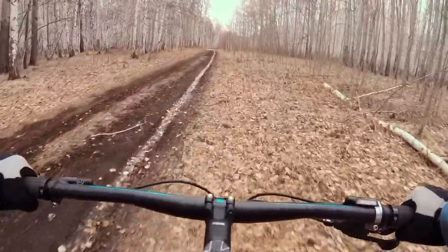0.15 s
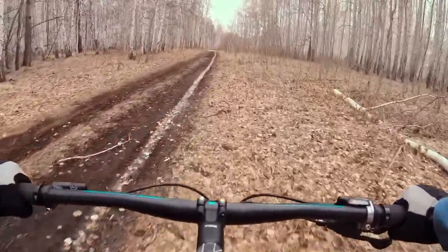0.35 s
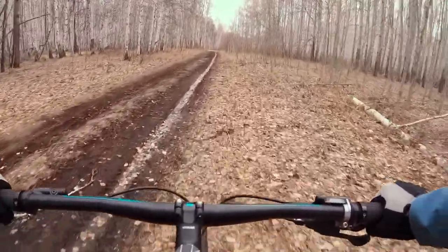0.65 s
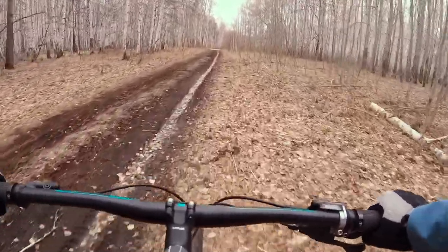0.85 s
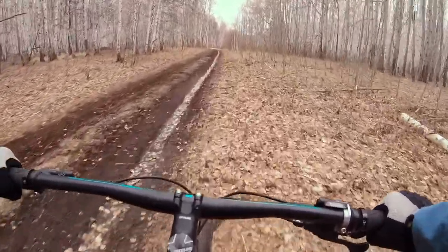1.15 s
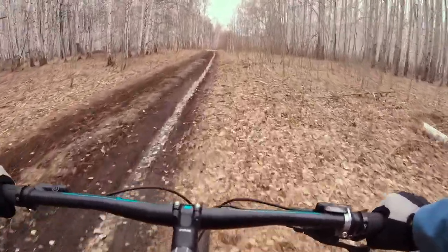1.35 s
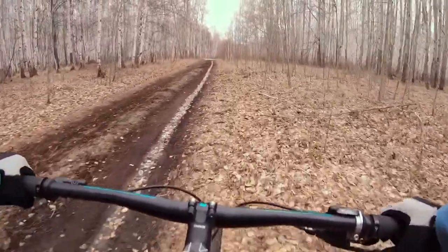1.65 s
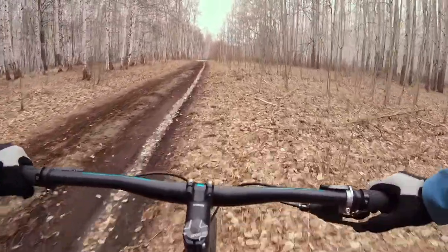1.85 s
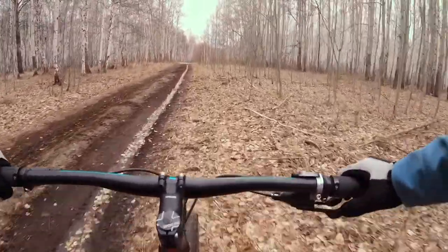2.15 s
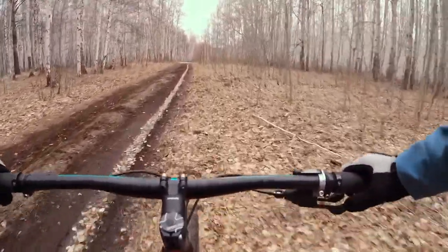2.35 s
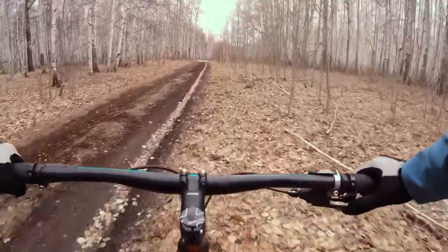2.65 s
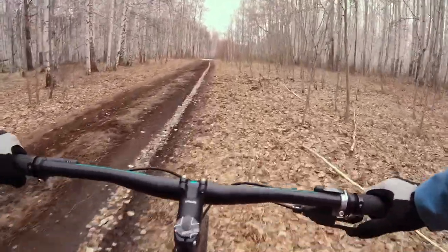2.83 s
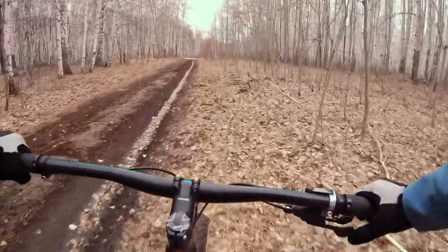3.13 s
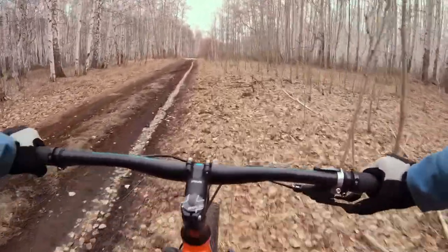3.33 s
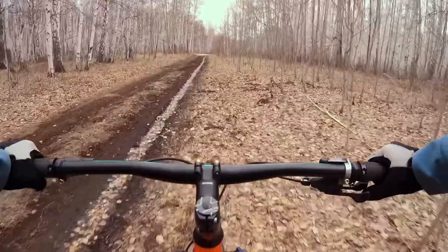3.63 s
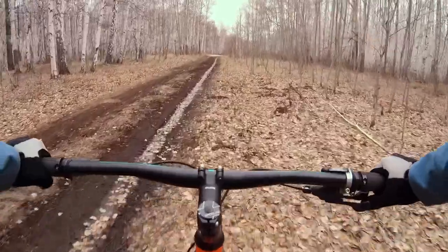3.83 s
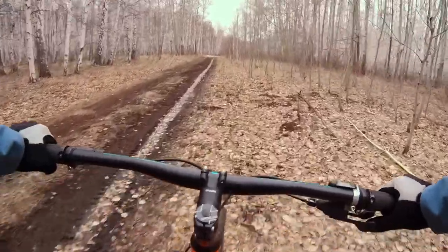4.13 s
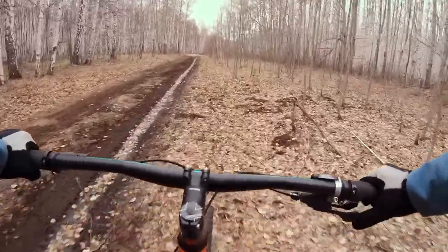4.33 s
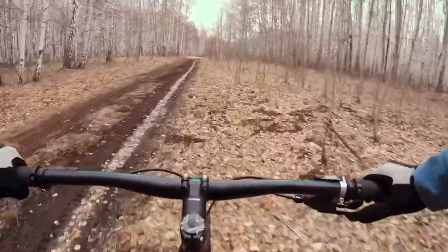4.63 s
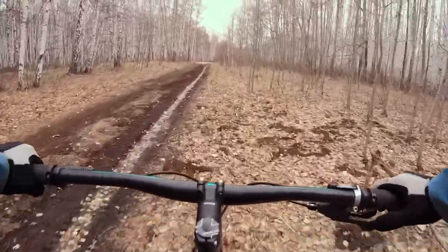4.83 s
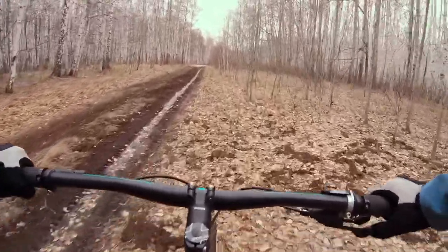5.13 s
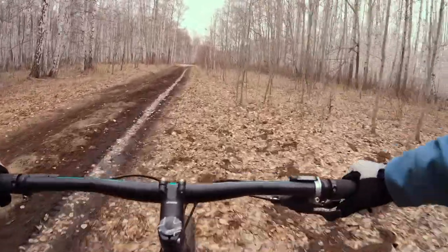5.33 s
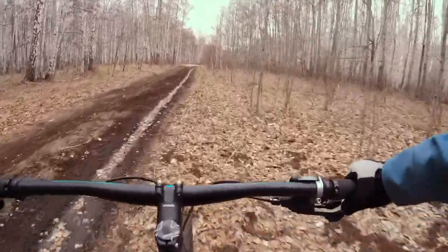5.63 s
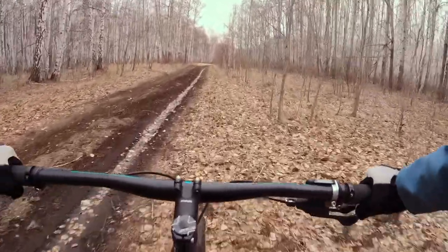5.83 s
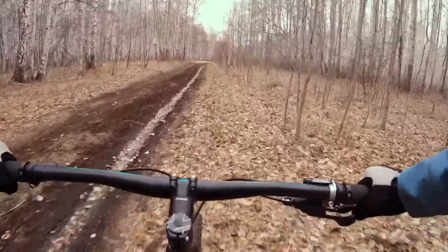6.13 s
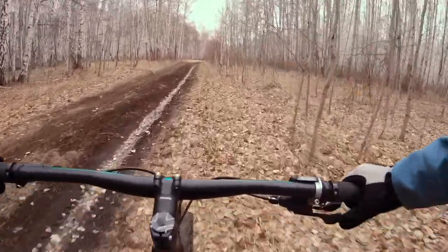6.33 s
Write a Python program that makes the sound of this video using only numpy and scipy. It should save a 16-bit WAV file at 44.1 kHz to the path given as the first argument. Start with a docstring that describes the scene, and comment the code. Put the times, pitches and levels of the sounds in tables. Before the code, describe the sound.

A handlebar-level, rider's view of tyres on leaf litter: crisp rustle on top, duller crunch beneath, flecked with tiny ticks and snaps. It starts moderate, thins after one second, then jolts over sticks with sharp cracks. Later the crackle is fuller, with dull root thuds and a rattling run of knocks just after five seconds. Low wind buffets the right side, strongest at the start and end.

```python
"""Mountain bike over dry leaves

Tyres crush leaf litter: dense random fractures, filtered to a bright rustle and a dull crunch, crackle on.
Thick heaps give way in clusters; twigs and curled leaves are short bursts of resonant noise.
Knocks ring the wheel as decaying sines, and ruts and roots drum the tyre casing.
The headwind, low-passed noise that flutters softly, is strongest on the right microphone port."""
import sys
import numpy as np
from scipy import signal
from scipy.fft import rfft, irfft, next_fast_len
from scipy.io import wavfile
from scipy.ndimage import map_coordinates

SR = 44100
rng = np.random.default_rng(int(sys.argv[2]) if len(sys.argv) > 2 else 0)


def bounce(signal):
    """Save signal as a 16-bit WAV file at the path given by the first command-line argument."""
    frames = np.transpose(np.atleast_2d(signal))
    limited = np.clip(frames, -1, 1)
    pcm = np.round(limited * 32767).astype(np.int16)
    wavfile.write(sys.argv[1], SR, pcm)


N = 285768

# relative spectrum of the packed layer's crunch: frequency_hz, density_db (per Hz)
CRUNCH_SPECTRUM = [(120, -27), (200, -22), (270, -10), (330, -5.5), (480, -3), (800, -1.5), (960, -0.5),
                   (1100, -6), (1580, -.5), (1900, -1), (2500, -8), (3230, -4), (3650, -6), (4000, -3.5),
                   (4450, -6), (4900, -4), (5700, -7.5), (7000, -4.5), (9100, -32), (15400, -120)]
# relative spectrum of the top leaves' rustle: frequency_hz, density_db (per Hz)
RUSTLE_SPECTRUM = [(4500, -27.5), (6400, -23), (7000, -2), (7450, -2), (8100, 2), (8700, 0.5), (9600, 2),
                   (10300, 1.8), (11200, 1), (13200, 1), (14800, -1.5), (16000, -3.5)]


def amp(db):
    """Level to amplitude: 20 dB is a factor of ten."""
    return 10 ** (np.asarray(db) / 20)


def unit(x):
    """Normalisation to an rms of 1."""
    return x / np.sqrt(np.mean(x ** 2) + 1e-20)


def along(points, hz):
    """Linear interpolation of (frequency, value) points over log frequency."""
    f, v = np.transpose(points)
    return np.interp(np.log(hz + 1), np.log(f + 1), v)


def curves(rows):
    """Linear interpolation over time: one curve for each column after the time."""
    times, *columns = np.transpose(rows)
    return [np.interp(np.arange(N) / SR, times, column) for column in columns]


def wobble(knots_per_s):
    """Slow modulation: a smooth spline through random knots."""
    knots = rng.standard_normal(int(N * knots_per_s / SR) + 4)
    return map_coordinates(knots, [np.arange(N) * knots_per_s / SR])


def filtered(x, response):
    """Linear filtering: the spectrum is multiplied by a function of frequency."""
    m = next_fast_len(N + SR // 4)  # padding keeps the tail from wrapping round
    return irfft(rfft(x, m) * response(np.fft.rfftfreq(m, 1 / SR)), m)[..., :N]


def add(track, start_s, sound):
    """Superposition: a sound is summed into a track from its start time."""
    part = track[..., max(round(start_s * SR), 0):][..., :sound.shape[-1]]
    part += sound[..., :part.shape[-1]]


def swells(rows):
    """Amplitude envelope: soft-edged bursts from (start_s, length_s, level_db) rows."""
    gain = np.zeros(N)
    for start_s, length_s, level_db in rows:
        add(gain, start_s, amp(level_db) * signal.windows.tukey(int(length_s * SR), .5))
    return gain


def fractures(rate_per_s, spread_db):
    """Brittle fracture: two random trains of single-sample cracks with log-normal, clipped sizes."""
    draws = rng.standard_normal((2, N))
    sizes = amp(spread_db * np.clip(draws, -2, 2)) * rng.choice([-1, 1], (2, N))
    return unit(sizes * (rng.random((2, N)) < rate_per_s / SR))


def collapses(rate_per_s, life_s, spread_db):
    """Relaxation: sudden starts at random times decay exponentially in power, with mean 1."""
    sizes = amp(2 * spread_db * np.clip(rng.standard_normal(N), -2, 2))
    starts = (rng.random(N) < rate_per_s / SR) * sizes
    power = signal.lfilter([1], [1, -np.exp(-1 / (life_s * SR))], starts)
    return power / power.mean()


def patchy(x, depth_db, width, length):
    """Varied colour: smooth random gains over patches of frequency bins and time frames."""
    z = signal.stft(x, nperseg=256)[2]
    field = rng.standard_normal(z.shape[1:])
    for axis, size in enumerate([width, length]):
        field = signal.convolve(field, np.expand_dims(np.hanning(size), 1 - axis), "same")
    return unit(signal.istft(z * amp(depth_db * unit(field)), nperseg=256)[1][:, :N])


def band_noise(size, pitch_hz, sharpness, apart):
    """Resonance of noise: one band-pass response, with a weaker side signal for stereo width."""
    hz = np.fft.rfftfreq(size, 1 / SR)
    colour = 1 / np.hypot(1, sharpness * (hz / pitch_hz - pitch_hz / (hz + 1)))
    mid, side = unit(irfft(rfft(rng.standard_normal((2, size))) * colour, size))
    return mid + np.outer([apart, -apart], side)


def at_ports(pair, spectrum):
    """Interaural-style coherence: two unrelated signals become coloured mid and side, mid at rms 1, then lean."""
    # likeness of the two ports, clipped below: frequency_hz, correlation
    likeness = [(500, 1), (850, 1), (1200, 0.78), (1800, 0.79), (2400, 0.19), (3000, 0.66), (3800, 0.052),
                (5000, .25), (6600, -0.2), (7200, 0.99), (15000, 1)]
    # left minus right: frequency_hz, difference_db
    lean = [(300, 0), (850, -0.5), (1150, -1), (1550, -6), (2000, -3.5), (2500, 6.5), (2900, 1),
            (3500, 4.5), (4700, -3), (5800, 3.5), (7000, -1), (10000, -0.9), (15000, 0.5)]

    def mid_side(hz):
        # the side-to-mid ratio tan(angle) gives a correlation of cos(2 angle)
        angle = np.arccos(np.clip(along(likeness, hz), -.9, .96)) / 2
        return amp(along(spectrum, hz)) * np.array([np.ones_like(hz), np.tan(angle)])

    mid, side = filtered(pair, mid_side)
    both = np.array([mid + side, mid - side]) / np.std(mid)
    return filtered(both, lambda hz: amp(np.outer([.5, -.5], along(lean, hz))))


def load():
    """Work done on the litter, as a level in dB: a slow course that dips on each thin patch."""
    # how hard the tyres work the litter: time_s, level_db
    course = [(0, -44), (0.55, -42.5), (0.8, -44.5), (1.15, -45), (1.27, -46.5), (1.7, -45.5), (2.0, -45),
              (2.42, -41.5), (2.55, -44.5), (2.85, -45), (3.12, -42), (3.35, -39), (4.3, -42.5),
              (4.98, -41.5), (5.15, -39), (5.6, -40), (6.1, -39.5), (6.48, -38)]
    # thin patches where the crackle drops: start_s, length_s, depth_db
    thin_patches = [(0.125, 0.21, 5), (1.36, 0.052, 5.5), (1.525, 0.077, 2.5), (1.704, 0.073, 1),
                    (2.074, 0.041, 4.5), (4.243, 0.12, 0), (4.467, 0.056, 5), (4.63, 0.088, 2),
                    (5.75, 0.07, 2.5), (6.065, .11, 0.5)]
    level_db, = curves(course)
    for start_s, length_s, depth_db in thin_patches:
        add(level_db, start_s, -depth_db * signal.windows.tukey(int(length_s * SR), .7))
    return level_db


def leaves():
    """Brittle fracture in two layers: bright top leaves and dull packed ones share the same collapses."""
    rustle_db, crunch_db = 0.15, -6.5  # relative to the load
    uneven_db, uneven_knots_per_s = 0.72, 24  # the litter lies unevenly
    bright_share, dull_share = .42, .5  # part of each layer's power that follows the collapses
    shared = collapses(rate_per_s=360, life_s=0.015, spread_db=1.5)
    tread = amp(load() + uneven_db * wobble(uneven_knots_per_s))
    bright = fractures(rate_per_s=13000, spread_db=4.0) * np.sqrt(1 - bright_share + bright_share * shared)
    dull = fractures(rate_per_s=5000, spread_db=1.0) * np.sqrt(1 - dull_share + dull_share * shared)
    bright = patchy(bright, depth_db=2.0, width=7, length=8)
    dull = patchy(dull, depth_db=2.4, width=5, length=7)
    rustle = amp(rustle_db) * at_ports(bright, RUSTLE_SPECTRUM)
    crunch = amp(crunch_db) * at_ports(dull, CRUNCH_SPECTRUM)
    return tread * (rustle + crunch)


def leaf_snaps():
    """Impulsive fracture: a whole leaf breaks in a broadband burst that decays in milliseconds."""
    count, level_db, spread_db, t60_s = 170, 3, 2.5, .007  # level over the load
    gain, t = np.zeros(N), np.arange(SR // 64) / SR
    for at, strength in zip(rng.integers(N, size=count), rng.uniform(-1, 1, count)):
        add(gain, at / SR, amp(level_db + spread_db * strength - 60 * t / t60_s))
    cracks = patchy(fractures(rate_per_s=12000, spread_db=3), depth_db=4, width=15, length=7)
    colour = at_ports(cracks, RUSTLE_SPECTRUM) + amp(-6) * at_ports(cracks, CRUNCH_SPECTRUM)
    return gain * amp(load()) * colour


def flakes():
    """Free vibration: each dry flake ticks as a decaying sine, louder at higher pitch."""
    load_db = load()
    t = np.arange(SR // 80) / SR
    at = rng.integers(N, size=1500)
    pitch_hz = rng.uniform(1400, 15000, len(at))
    scatter_db = 2.5 * np.clip(rng.standard_normal(len(at)), -2, 2)
    size_db = load_db[at] - 1.5 + scatter_db + 4.5 * np.log(pitch_hz / 9000)
    t60_s = .011
    ticks = amp(size_db[:, None] - 60 * t / t60_s) * np.sin(2 * np.pi * pitch_hz[:, None] * t)
    out = np.zeros((2, N))
    for start, tick, pan_db in zip(at, ticks, rng.normal(0, 0.69, len(at))):
        add(out, start / SR, np.outer(amp([pan_db, -pan_db]), tick))
    return out


def heaps():
    """Clustered fracture: a thick heap gives way suddenly, with its own share of dull crunch."""
    # thick heaps, the crunch relative to the level: start_s, length_s, level_db, crunch_db
    thick_heaps = [(0.02, 0.071, -44, -4.5), (0.353, 0.05, -42.5, -10), (0.441, 0.043, -39.5, -11.5),
                   (.525, .07, -50, -4), (1.091, .035, -51, -1), (1.578, .072, -45.5, -7.5),
                   (1.833, .055, -52.5, -2), (1.951, .04, -45, -10), (2.12, 0.038, -35.5, -10.5),
                   (2.205, 0.23, -40, -8), (2.272, 0.038, -45, -11), (2.731, 0.046, -46, -5),
                   (2.905, 0.048, -44.5, -9), (3.184, 0.08, -39.5, -7), (3.714, .045, -41, -7.5),
                   (4.086, 0.14, -40.5, -9), (4.39, 0.08, -44, -5), (4.542, 0.054, -43, -4.5),
                   (5.026, .046, -36, -7), (5.1, 0.21, -42.5, -10.5), (5.687, 0.034, -42.5, -12),
                   (5.912, 0.017, -36, -7), (6.169, 0.032, -40.5, -4.5), (6.345, 0.081, -38, -14)]
    attack_s, release_share = 0.0047, 0.27  # the fade takes the last part of the length
    gains = np.zeros((2, N))
    for start_s, length_s, level_db, crunch_db in thick_heaps:
        t = np.arange(int(length_s * SR)) / SR
        shape = np.minimum(t / attack_s, 1) * np.minimum((length_s - t) / (release_share * length_s), 1)
        add(gains, start_s, np.outer(amp([level_db, level_db + crunch_db]), shape))
    clusters = collapses(rate_per_s=1000, life_s=0.0039, spread_db=0)
    cracks = fractures(rate_per_s=16000, spread_db=3.5) * np.sqrt(clusters)
    return gains[0] * at_ports(cracks, RUSTLE_SPECTRUM) + gains[1] * at_ports(cracks, CRUNCH_SPECTRUM)


def brittle_leaves():
    """Plate resonance: a stiff curled leaf sounds its own note while it is flattened."""
    # curled leaves, levels before the trim below: start_s, length_s, level_db, pitch_hz
    curled = [(0.357, .03, -42, 4300), (.44, .04, -45, 4400), (0.527, .07, -46, 4500),
              (2.273, 0.055, -39.5, 2900), (3.038, .036, -46, 3130), (3.184, .06, -43.5, 3600),
              (4.08, 0.068, -39.5, 3730), (5.034, 0.032, -40, 3400), (5.111, 0.13, -45, 3880),
              (5.48, 0.048, -41.5, 1550), (5.56, 0.067, -44, 4470)]
    out = np.zeros((2, N))
    for start_s, length_s, level_db, pitch_hz in curled:
        size = int(length_s * SR)
        note = band_noise(size, pitch_hz, sharpness=2.8, apart=0.39)
        add(out, start_s, amp(level_db - 6) * signal.windows.tukey(size, .5) * note)
    return out


def twigs():
    """Impulse and resonance: each snap is a click and a noise burst at the twig's pitch; stalks break at random."""
    # snapping twigs, levels before the trims below: start_s, level_db, pitch_hz, sharpness
    snaps = [(.136, -34, 4500, 1.5), (.36, -25, 12000, 1), (0.367, -30, 6000, 1), (0.399, -24, 9000, .8),
             (.468, -23, 11500, 3), (0.634, -31, 6000, 1), (.645, -28, 12000, 3), (0.851, -33, 9000, 1),
             (1.348, -32, 10000, 2), (1.366, -31.5, 5500, 2.5), (1.748, -24.5, 7550, 2.5),
             (1.81, -23, 8950, 3.7), (1.955, -34, 12000, 2), (2.068, -29.5, 4500, 1.5),
             (2.154, -18, 9200, 0.87), (2.2825, -22, 8000, 1), (2.292, -24, 6800, 2),
             (2.296, -25, 8000, .8), (2.305, -14.5, 11000, 0.73), (2.483, -32, 5000, 1.5),
             (2.5832, -23.5, 6500, 1.3), (2.761, -27, 7500, 1.3), (2.837, -25, 8950, 2.5),
             (2.896, -30, 8000, 2.5), (2.991, -28.5, 5000, 2), (3.038, -31, 9050, 2.5),
             (3.061, -31, 4500, 1.5), (3.316, -29, 5600, 4), (3.396, -28, 7000, .8), (3.626, -24, 10700, 6),
             (4.129, -29, 4500, 1.5), (4.199, -23, 10000, 3), (4.356, -29, 10000, 2),
             (4.411, -28, 5000, 1.1), (4.75, -25, 9000, 1.5), (4.782, -24, 6540, 2.6),
             (4.794, -30, 5500, 2), (4.986, -33, 4500, 1.3), (5.074, -22.5, 9000, 2.2),
             (5.224, -27, 4000, 1), (5.229, -28, 3500, 1), (5.344, -20, 10000, 1.1), (5.403, -24, 12500, 3),
             (5.588, -22, 10000, 3.3), (5.703, -35, 4200, 2), (5.728, -32, 5000, 2),
             (5.919, -28, 9000, 1.5)]
    t60_s = 0.0048
    stalk_db, stalk_spread_db = 5.5, 2.5  # over the load, scatter
    out, t = np.zeros((2, N)), np.arange(SR // 32) / SR
    load_db = load()
    stalks = []
    for at in rng.integers(N, size=45):
        level_db = load_db[at] + stalk_db + stalk_spread_db * rng.uniform(-1.1, 1)
        stalks.append((at / SR, level_db, rng.uniform(2800, 10300), rng.uniform(1, 3.2)))
    for start_s, level_db, pitch_hz, sharpness in stalks + snaps:
        click = np.cos(2 * np.pi * pitch_hz * t) * np.exp(-pitch_hz * t)
        burst = amp(-60 * t / t60_s) * band_noise(len(t), pitch_hz, sharpness, apart=0.47)
        add(out, start_s, amp(level_db - 4.0) * burst + amp(level_db - 6.0) * click)
    return out


def wheels():
    """Modal synthesis: sticks, bumps and debris crack against the wheel and excite its damped modes."""
    # sticks and bumps, light hard sticks higher, levels before the trim below: start_s, level_db, pitch_ratio
    knocks = [(.058, -33, 1.4), (.4, -31.5, 2), (.581, -33.5, 1.5), (.85, -37, 1.5), (.994, -41, 1.2),
              (1.109, -32, 1.12), (1.242, -44, 1.3), (1.613, -38, 1.5), (1.836, -32, 1.8), (1.98, -39, 2.3),
              (2.132, -33, 0.86), (2.153, -28, 1.1), (2.221, -35, 1.46), (2.2825, -29, 1.05),
              (2.292, -27, 0.93), (2.3045, -21, 1.04), (3.043, -32, 1.33), (3.258, -33, 1.05),
              (3.397, -33, 1.8), (3.849, -36, 0.99), (4.065, -30.5, 0.96), (4.099, -32, 1.1),
              (4.227, -31, 1.04), (4.544, -39, 1.2), (4.748, -36, 1.7), (4.987, -35, 1.2),
              (5.038, -32, 1.05), (5.11, -30, 1), (5.153, -33, 0.97), (5.193, -32, 0.99),
              (5.211, -31, 0.96), (5.228, -32, 1.3), (5.278, -30.5, 0.9), (5.873, -28, 1),
              (5.955, -30, 0.84), (6.012, -30, 1.4)]
    # the wheel's modes before each knock's scatter: frequency_hz, level_db, t60_s
    modes = [(533, -8, 0.015), (709, -3.5, 0.021), (903, 0, 0.0092), (1210, -2, 0.0056), (1670, -4, 0.011),
             (2200, -21, 0.0057), (3230, -7, 0.0046)]
    debris_db, debris_spread_db = -3, 3  # over the load, scatter
    crack_db, crack_hz, crack_t60_s = -9.5, 2600, 0.013  # the dry crack, relative to the knock
    out, t = np.zeros((2, N)), np.arange(SR // 16) / SR
    load_db = load()
    debris = []
    for at in rng.integers(N, size=320):
        level_db = load_db[at] + debris_db + debris_spread_db * rng.uniform(-1.2, 1)
        debris.append((at / SR, level_db, rng.uniform(0.88, 1.115)))
    for start_s, level_db, ratio in debris + knocks:
        ring = np.zeros(len(t))
        for hz, mode_db, t60_s in modes:
            decay = amp(mode_db + 1.6 * rng.normal() - 60 * t / t60_s)
            mode_hz = hz * ratio * (1 + 0.045 * rng.normal())
            ring += decay * np.sin(2 * np.pi * (mode_hz * t + rng.random()))
        crack = amp(crack_db - 60 * t / crack_t60_s) * band_noise(len(t), crack_hz, sharpness=0.94, apart=.45)
        onset = 1 - np.exp(-t / 0.00019)
        add(out, start_s, amp(level_db - 5) * (ring * onset + crack))
    return out


def patter():
    """Dense excitation: stick strikes too close to tell apart merge into one hollow resonance of noise."""
    # runs of small sticks on the wheel: start_s, length_s, level_db
    stick_runs = [(2.125, .035, -49), (2.279, 0.037, -42.5), (3.5, .14, -58), (3.85, 0.42, -57.5),
                  (5.03, .04, -51), (5.18, 0.066, -51)]
    return swells(stick_runs) * band_noise(N, pitch_hz=733, sharpness=4.6, apart=0.11)


def tyres():
    """Forced and free vibration: knobs on hard ground drum the casing; roots thud over a low boom of tyre air."""
    # ruts and roots that drum the tyres, levels before the trim below: start_s, length_s, level_db
    ruts = [(.77, .041, -60), (1.92, .055, -47), (2.113, 0.05, -45), (2.27, .066, -47), (3.01, 0.046, -51),
            (3.54, .1, -49.5), (4.03, 0.18, -53), (4.38, 0.25, -49), (5.19, 0.16, -56.5),
            (5.86, 0.098, -54), (6.25, 0.29, -49)]
    # relative spectrum of the casing: frequency_hz, density_db (per Hz)
    casing_spectrum = [(60, -38), (130, -6), (220, -5), (330, 0.5), (450, 3.5), (650, -3), (1000, -12),
                       (2500, -24)]
    # single roots, levels before the trim below: start_s, level_db, pitch_hz
    thuds = [(.79, -39.5, 251), (1.485, -42, 300), (1.7, -47, 220), (1.93, -40, 560), (1.956, -39, 350),
             (1.978, -39, 280), (2.035, -42, 180), (2.218, -40, 240), (4.455, -40, 270), (5.277, -41, 300),
             (5.957, -40, 380), (6.315, -42, 220), (6.356, -33.5, 280), (6.39, -44, 330)]
    t60_s, attack_s = 0.039, .001
    boom_hz, boom_db = 155, -5  # centre of the scattered pitch, level relative to the thud
    out = amp(-6.0) * swells(ruts) * at_ports(fractures(rate_per_s=900, spread_db=4), casing_spectrum)
    t = np.arange(SR // 12) / SR
    onset = 1 - np.exp(-t / attack_s)
    for start_s, level_db, pitch_hz in thuds:
        tone = np.sin(2 * np.pi * pitch_hz * t)
        casing = 0.62 * tone + 0.73 * band_noise(len(t), pitch_hz, sharpness=1.6, apart=.15)
        # the boom decays at half the casing's rate in dB
        boom_decay = amp(boom_db - 30 * t / t60_s)
        boom = boom_decay * np.sin(2 * np.pi * boom_hz * (1 + .1 * rng.normal()) * t)
        add(out, start_s, amp(level_db - 5.0) * onset * (amp(-60 * t / t60_s) * casing + boom))
    return out


def wind():
    """Turbulent pressure: low-frequency noise buffets the ports, strongest on the right one, facing the flow."""
    # headwind, levels before the port gains below: time_s, level_db
    headwind = [(0, -51.5), (0.6, -53.5), (1.05, -59.5), (1.65, -63), (1.95, -55.5), (2.45, -57),
                (2.62, -65), (3.2, -59), (3.55, -66.5), (4.75, -60.5), (4.97, -68), (5.5, -57.5),
                (6.05, -62), (6.48, -51.5)]
    # single gusts, levels before the port gains below: start_s, level_db
    short_gusts = [(.755, -65), (1.455, -62), (1.68, -65), (2.7, -69), (3.01, -59), (4.43, -61),
                   (5.865, -64), (6.16, -57)]
    # relative spectrum of the eddies: frequency_hz, density_db (per Hz)
    eddy_spectrum = [(15, -25), (28, -2), (45, -2), (95, 0), (140, -3), (220, -6.5), (400, -17.5),
                     (800, -29), (2500, -46)]
    gust_length_s, flutter_db, flutter_knots_per_s = 0.078, 1, 22
    buffet_db, = curves(headwind)
    strength = amp(buffet_db + flutter_db * wobble(flutter_knots_per_s))
    strength = strength + swells([(start_s, gust_length_s, level_db) for start_s, level_db in short_gusts])
    eddies = unit(filtered(rng.standard_normal((2, N)), lambda hz: amp(along(eddy_spectrum, hz))))
    left, right = eddies * strength
    # a little of the right port's wind reaches the left
    return np.array([amp(-11) * left + amp(-18.5) * right, amp(5.5) * right])


def scene():
    """Superposition of litter, tyres, wheels and headwind in the open air."""
    litter = leaves() + leaf_snaps() + flakes() + heaps() + brittle_leaves() + twigs()
    bike = tyres() + wheels() + patter()
    return litter + bike + wind()


def record(dry):
    """Band limiting: nothing passes at or above the top frequency."""
    top_hz = 15850
    return filtered(dry, lambda hz: hz < top_hz)


dry = scene()
out = record(dry)
bounce(out)
```